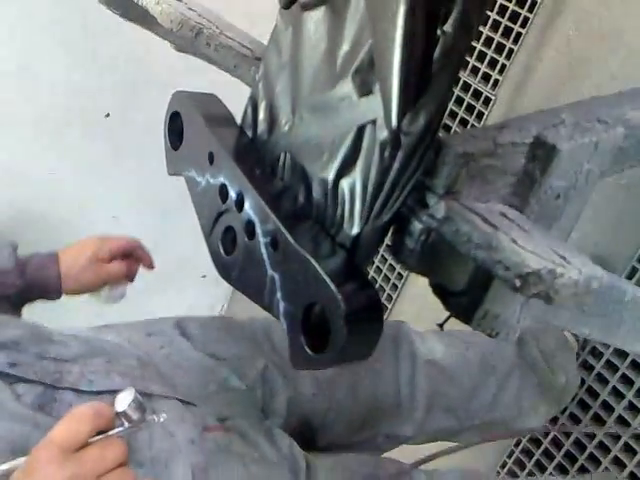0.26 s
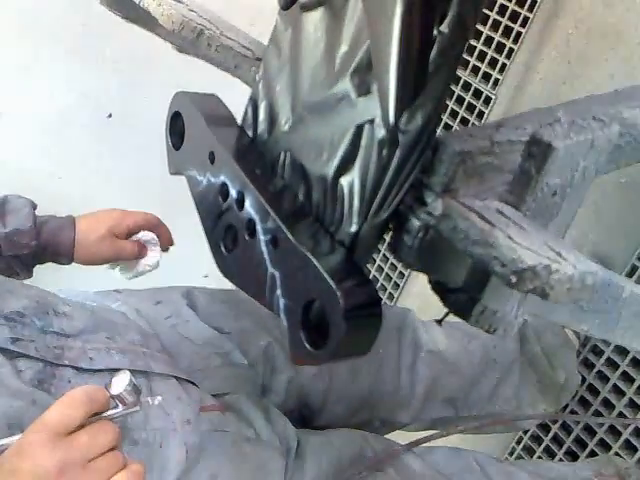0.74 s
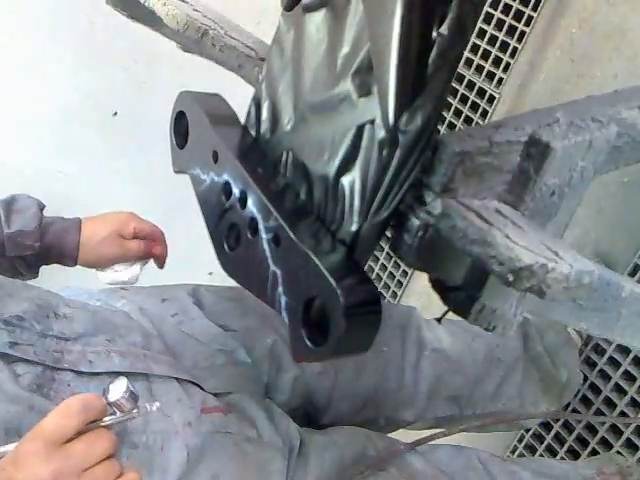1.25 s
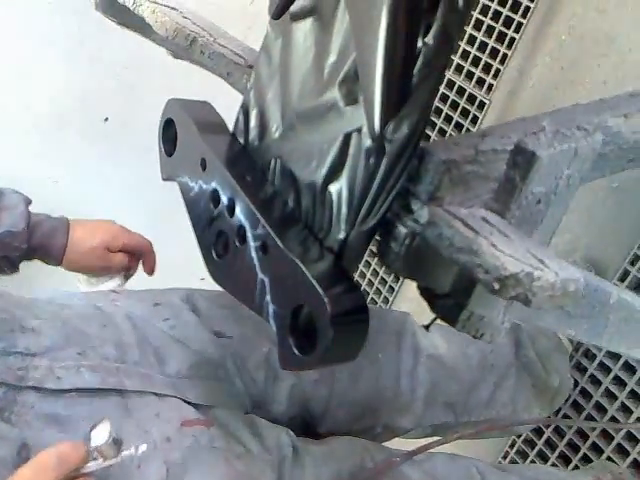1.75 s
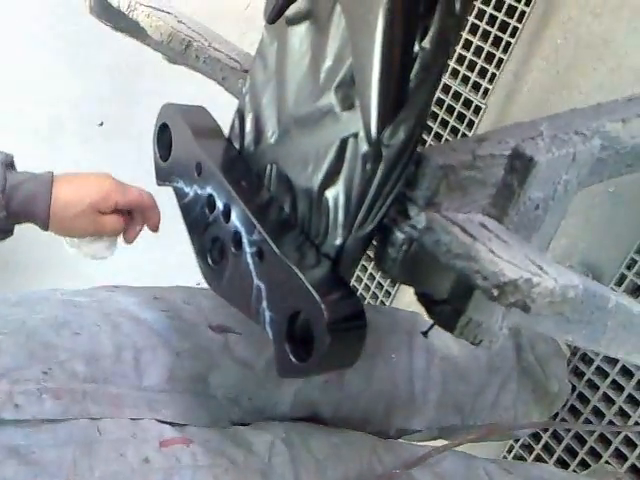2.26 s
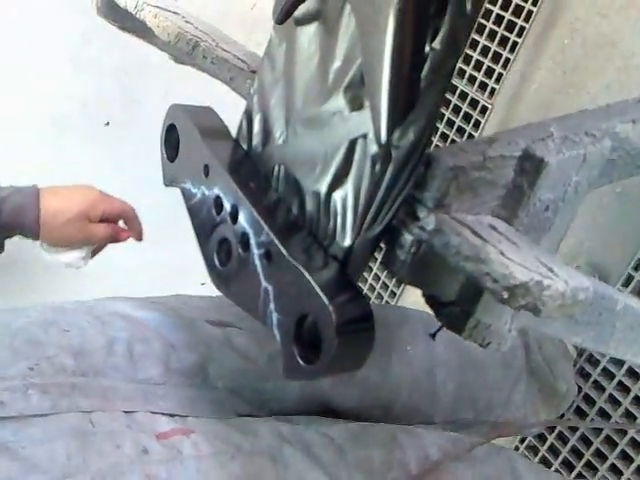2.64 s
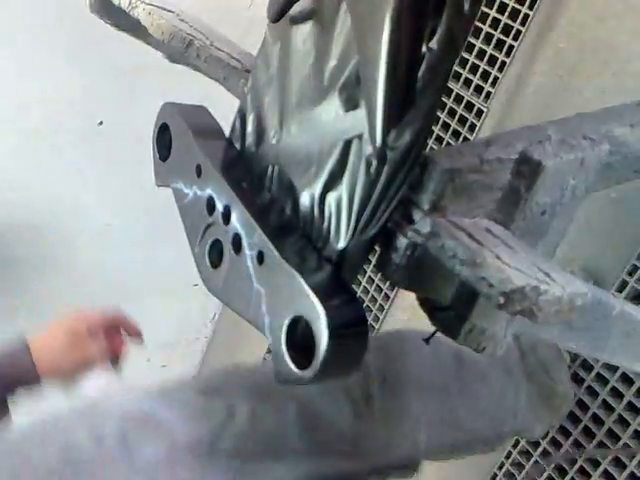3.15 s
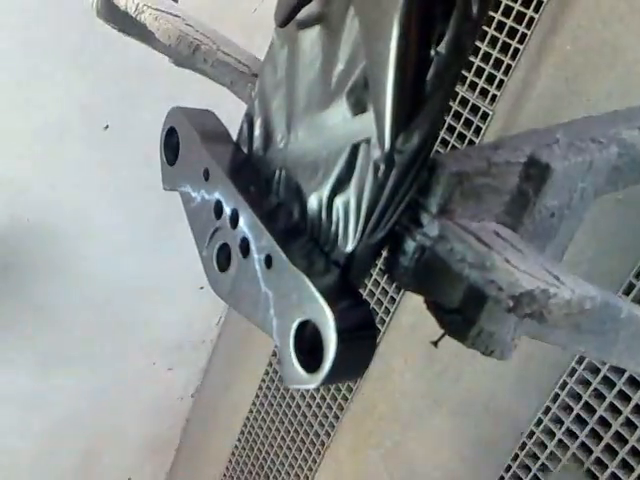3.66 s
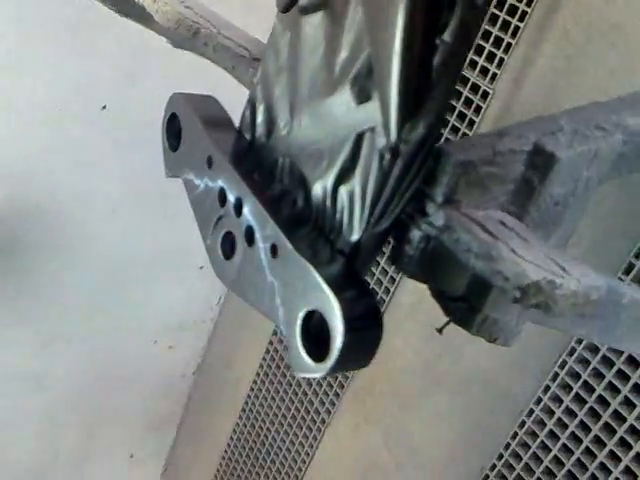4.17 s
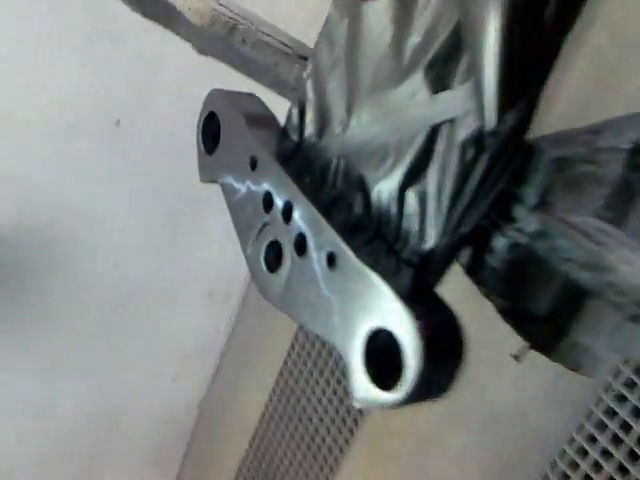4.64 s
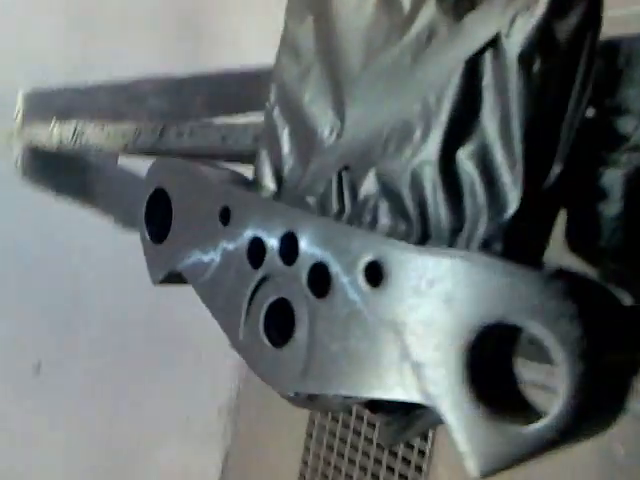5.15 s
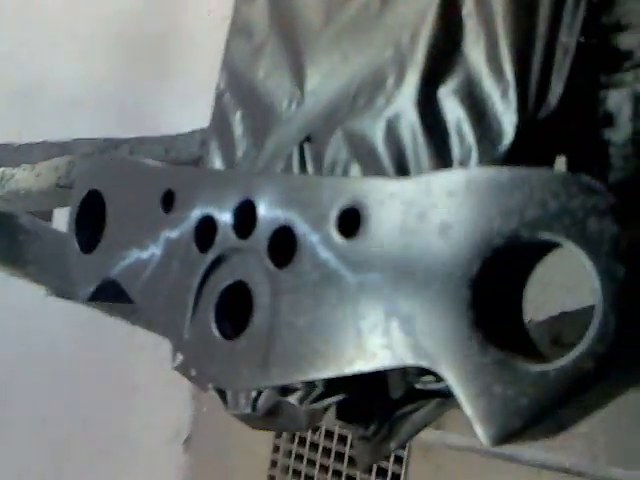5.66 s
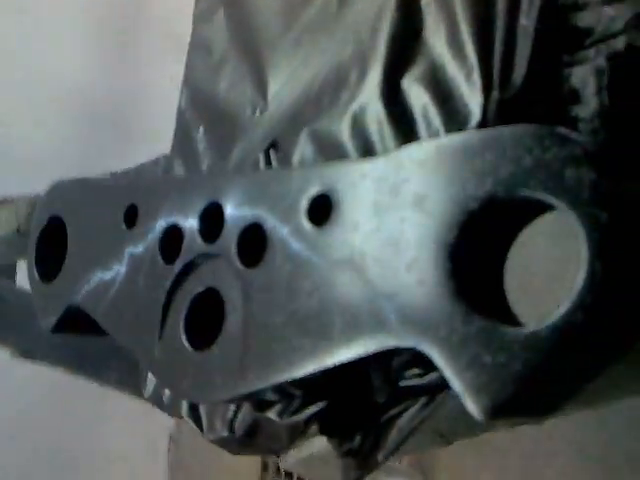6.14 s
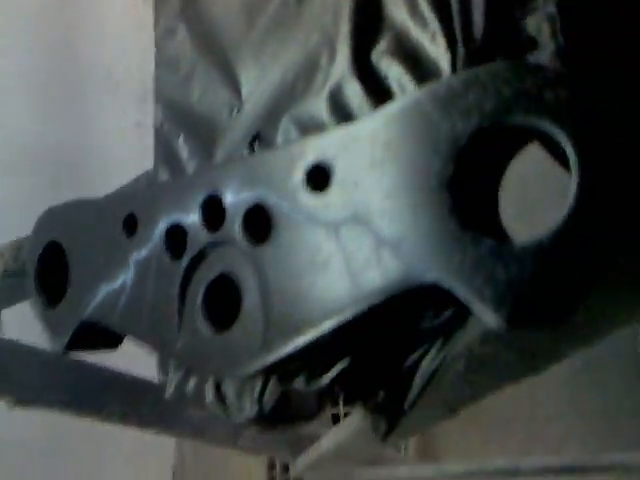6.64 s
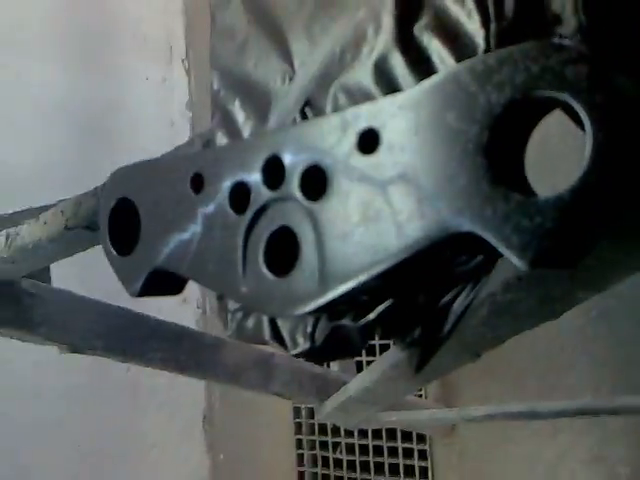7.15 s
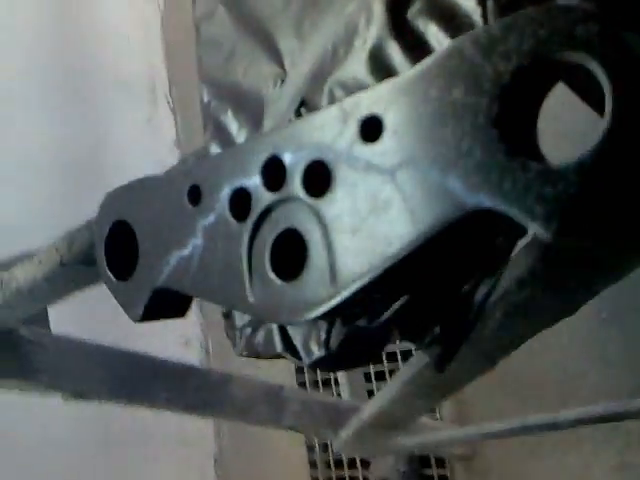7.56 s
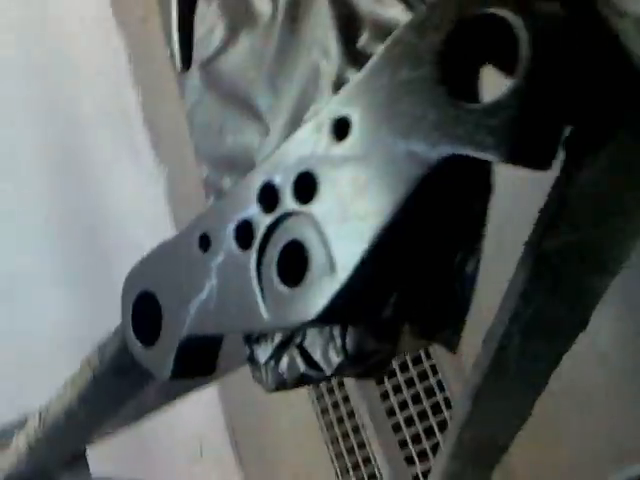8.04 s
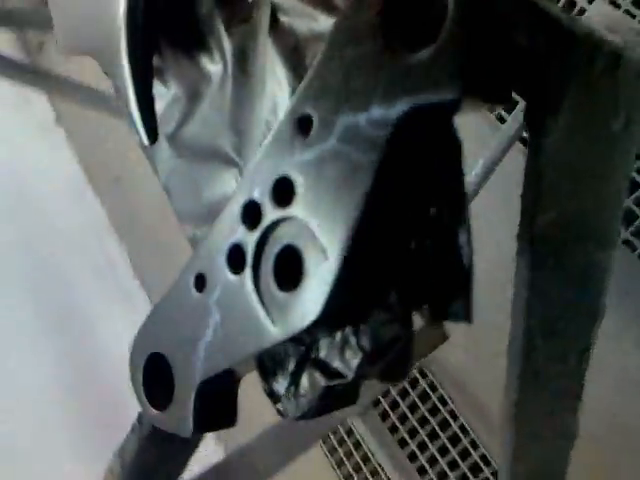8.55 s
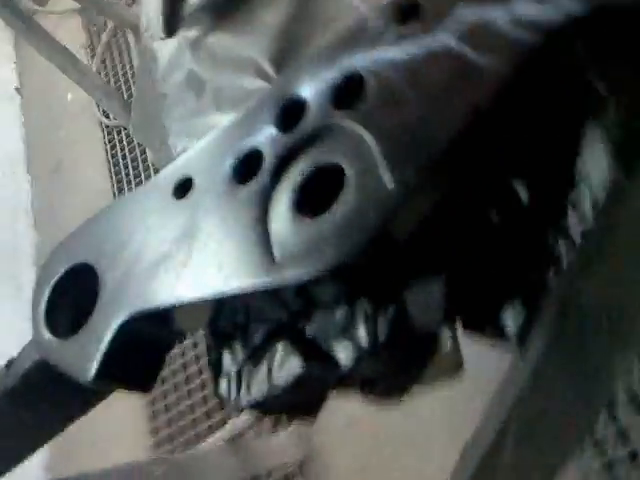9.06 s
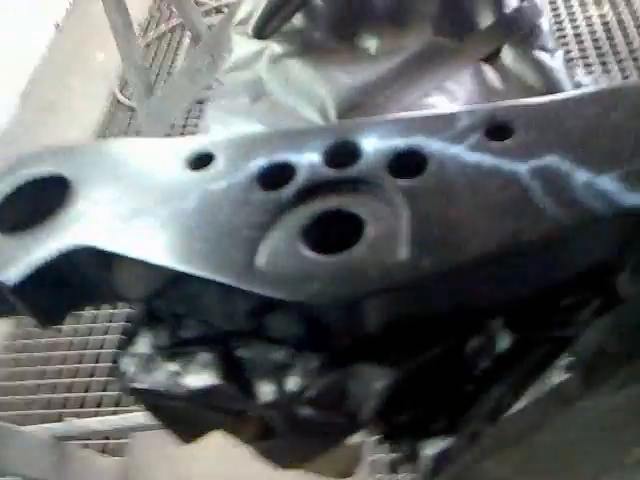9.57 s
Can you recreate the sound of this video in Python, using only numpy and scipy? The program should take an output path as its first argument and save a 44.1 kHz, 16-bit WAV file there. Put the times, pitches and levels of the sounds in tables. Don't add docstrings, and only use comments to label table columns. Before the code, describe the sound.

In a hard-walled spray booth, a big extraction fan roars low and steady with humming tones and dull, faint sheet rattles. For about four and a half seconds the microphone stays still; then it is carried about, bringing low draught buffets, finger thumps, a hard double knock past six seconds, a scratchy rub and snap past seven and a half, and a last thump near the end. The microphone is small and muffled.

```python
import sys
import numpy as np
from scipy import signal
from scipy.fft import rfft, irfft
from scipy.io import wavfile

SR = 44100
rng = np.random.default_rng(int(sys.argv[2]) if len(sys.argv) > 2 else 0)


def natural_amplitude(level_db):
    exponent = np.asarray(level_db, float) / 20
    return 10 ** exponent


def generate_wav(signal):
    frames = np.transpose(np.atleast_2d(signal))
    scaled = np.clip(frames, -1, 1) * 32767
    pcm = np.round(scaled).astype(np.int16)
    wavfile.write(sys.argv[1], SR, pcm)


N = 432180

SHAFT_HZ, MOTOR_HZ = 15.622, 382.6
STILL_LOW_DB, STILL_MID_DB, STILL_TOP_DB = -1, -0.73, -8
MIDS_FOLLOW, TREBLE_FOLLOWS = 1, 0.8
TURN_S, TURN_LENGTH_S, TURN_DB = 6.48, 0.14, 7
PUFF_HZ, PUFF_LETS_GO, PRESS_LETS_GO = 105, 1.55, 1.18
CASING_HZ, CASING_T60_S, CASING_DB = 400, 0.03, -15.5
DULL_RING_HZ = 770
RUSTLE_LOW_HZ, RUSTLE_HIGH_HZ = 2800, 6200
BASS_CUT_HZ, HISS_DB = 33, -97.5

# pitch_hz, level_db (per Hz)
ROAR_COLOUR = [(20, -20), (45, -13.5), (90, -3), (160, -5.5), (260, -5.5), (380, -7.5), (550, -14),
               (760, -15.5), (1000, -17), (1400, -23.5), (2200, -40), (3500, -53), (4500, -63), (6000, -71),
               (9000, -89.5)]
# order (multiple of the turning speed), level_db (rms)
SHAFT_TONES = [(2, -67), (3, -55.5), (4, -51), (6, -54), (8, -61.5), (9, -61.5), (12, -55.5), (16, -63.5),
               (17, -62), (21, -55.5), (42, -70), (48, -61.5)]
# order (multiple of its lowest pitch), level_db (rms)
MOTOR_TONES = [(1, -62), (2, -71.5), (3, -75.5)]
# pitch_hz, level_db (rms)
SECOND_DRIVE = [
    (129.3, -53.5),
    (275.7, -56),
]
# pitch_hz, width_hz, level_db (rms)
DUCT_HUMS = [(93, 5.3, -66.5), (151.3, 11, -68.5), (192.9, 7.6, -61), (806, 21, -72.5)]
# time_s, tone_gain_db
STANDING_WAVES = [(0, 2.3), (4.5, 0.2), (5.6, 4), (6.35, 2.5), (7.0, 1.5), (8.0, 0.3), (9.05, 2),
                  (9.8, -0.4)]
# time_s, nearness_db (to the filter wall), uncovered_db (port)
GRIP_MOVES = [(0, -1.5, 2), (4.5, 0.5, 0), (4.95, -3, 1), (5.5, -2.5, 7), (5.65, -3, 6), (5.95, -5.5, 6),
              (6.44, 0, 2), (6.61, 2, 3.5), (7.0, 1.5, 7), (7.4, 2.5, 0), (7.64, 0, 6.5), (7.85, 1.5, 7),
              (8.13, 1.5, 6), (8.55, -1.5, 4.5), (8.8, -1, 3.5), (9.09, -3, 9), (9.4, -3.5, 2.5),
              (9.8, -4, 5.5)]
# time_s, level_db (rms)
DRAUGHT_LEVEL = [(0, -64.5), (4.4, -59), (4.9, -46.5), (5.37, -40.5), (5.68, -58.5), (6.1, -45),
                 (6.8, -50.5), (7.26, -41), (7.42, -54), (7.78, -42.5), (8.15, -47), (8.8, -46),
                 (9.09, -40.5), (9.5, -51.5), (9.8, -36)]
# peak_s (moment of the peak), peak_db
PORT_PUFFS = [(4.539, -27.5), (4.579, -30), (4.779, -27), (4.868, -33), (5.11, -33), (5.241, -27),
              (5.327, -37), (5.373, -33), (6.73, -31), (6.790, -29), (7.08, -28.5), (7.429, -27),
              (7.745, -40), (8.012, -31), (8.094, -28.5)]
# peak_s (moment of the peak), peak_db, pitch_hz, slower (how many times slower
FINGER_SNAPS = [
    (4.598, -26.5, 139, 1.9),
    (5.094, -28, 155, 2),
    (6.2755, -16.5, 220, 1.56),
    (6.2854, -22, 232, 2.6),
    (7.579, -19.5, 400, 1.65),
    (8.805, -22.5, 150, 1.9),
    (8.871, -29.5, 138, 1.5),
    (9.7144, -19.5, 253, 1.8),
]
# peak_s (moment of the peak), peak_db, pitch_hz
FINGER_PRESSES = [(4.949, -31, 80), (6.2730, -21, 282), (6.2828, -21, 75), (7.199, -30.5, 150),
                  (7.418, -28, 59), (7.5737, -26.5, 280), (7.583, -25.5, 200), (7.590, -25, 70),
                  (7.732, -27.5, 218), (7.751, -29.5, 75), (9.706, -25, 62)]
# middle_s, level_db (rms), length_s, extra_db (above 6 kHz)
FINGER_RUBS = [(6.28, -93, .012, 27), (7.418, -42, 0.013, -2.5), (7.586, -48.5, 0.0081, 0.5),
               (7.754, -53, 0.011, -5), (7.793, -57, 0.0095, -8), (7.965, -73, 0.032, 5.5),
               (8.223, -70, .022, 5), (8.261, -74.5, 0.026, 0.5), (9.127, -74.5, .016, 1.5),
               (9.716, -88, 0.0036, 16), (7.435, -66.5, 0.02, 2.5)]
# pitch_hz, level_db (per Hz)
RUB_COLOUR = [(400, -21), (900, 2.5), (1700, 1), (2570, -9.5), (2950, -15), (3300, -9.5), (4390, -6),
              (5500, -16.5), (6960, -19.5), (8890, -29.5), (16000, -32)]
# start_s, peak_db, pitch_hz, t60_s (time to fall by 60 dB)
STIFF_TICK = (7.965, -69, 6050, .03)
# middle_s, level_db (rms), length_s
SLEEVE_RUSTLES = [
    (6.45, -97, 0.17),
    (6.948, -93, .3),
    (8.55, -90.5, .35),
]
# start_s, peak_db
DULL_RINGS = [(0.693, -38.5), (1.108, -47), (1.523, -44), (1.67, -44), (1.758, -40.5), (2.106, -39),
              (2.233, -37.5), (2.461, -37), (4.071, -41), (5.409, -38.5), (5.458, -41), (6.536, -36),
              (6.584, -33), (6.727, -33), (6.828, -34), (7.245, -40), (7.405, -33), (7.662, -33),
              (7.685, -29), (7.867, -40), (8.101, -44), (8.201, -34.5), (9.042, -37.5), (9.383, -38)]
# time_s, level_db (rms)
GUN_LEAK = [
    (0, -110),
    (.7, -106),
    (1.0, -97),
    (1.65, -97),
    (1.8, -107),
    (9.8, -104),
]


def in_time(rows):
    times, *columns = np.transpose(rows)
    return [np.interp(np.arange(N) / SR, times, column) for column in columns]


def rms_one(x):
    return x / np.sqrt(np.mean(x ** 2) + 1e-20)


def drift(rate):
    r = np.exp(-80 * np.pi * rate / SR)
    noise = rng.standard_normal(N // 40 + 2002)
    slow = signal.lfilter([1], [1, -2 * r, r * r], noise)[2000:]
    return np.interp(np.arange(N) / 40, np.arange(len(slow)), rms_one(slow))


def coloured(x, spectrum):
    hz, level_db = np.transpose(spectrum)
    bins = np.maximum(np.fft.rfftfreq(N, 1 / SR), 1)
    gain = natural_amplitude(np.interp(np.log(bins), np.log(hz), level_db))
    return irfft(rfft(x) * gain, N)


def filtered(x, order, hz, kind):
    return signal.sosfilt(signal.butter(order, hz, kind, fs=SR, output="sos"), x)


def air_roar(gust_db=2.38, flicker_db=1.06, throb_db=-0.5):
    turn = np.cos(2 * np.pi * SHAFT_HZ * np.arange(N) / SR + 0.8 * drift(2.3))
    gusts = gust_db * drift(45) + 0.76 * drift(2.0)
    white = rng.standard_normal((2, N))
    edges = 16 * 2 ** np.arange(0, 10.1, 0.5)
    out = 0
    for k, (low, high) in enumerate(zip(edges, edges[1:])):
        band = filtered(white[k % 2], 2, [low, high], "band")
        throb = throb_db * np.exp(-np.log2(low / 1100) ** 2 / 2.0) * turn
        gust = gusts / (1 + (low / 4000) ** 2)
        out = out + band * natural_amplitude(gust + throb + flicker_db * drift(26))
    return natural_amplitude(-44.5) * rms_one(coloured(out, ROAR_COLOUR))


def tones(speed_hz, orders, waver_db, slip):
    phase = 2 * np.pi * np.cumsum(speed_hz * (1 + slip * drift(0.65))) / SR
    out = 0
    for order, level_db in orders:
        level = np.sqrt(2) * natural_amplitude(level_db + waver_db * drift(2.1))
        out = out + level * np.sin(round(order) * phase + rng.uniform(0, 2 * np.pi))
    return out


def machine_tones():
    hum = tones(SHAFT_HZ, SHAFT_TONES, waver_db=3.0, slip=0.0008)
    hum = hum + tones(MOTOR_HZ, MOTOR_TONES, waver_db=5.0, slip=0.0008)
    for hz, level_db in SECOND_DRIVE:
        hum = hum + tones(hz, [(1, level_db)], waver_db=2.0, slip=0.003)
    return natural_amplitude(in_time(STANDING_WAVES)[0]) * hum


def duct_hum():
    out = 0
    for hz, width, level_db in DUCT_HUMS:
        r = np.exp(-np.pi * width / SR)
        section = [1, 0, -1, 1, -2 * r * np.cos(2 * np.pi * hz / SR), r * r]
        hum = signal.sosfilt([section, section], rng.standard_normal(N))
        out = out + natural_amplitude(level_db) * rms_one(hum)
    return out


def fan_through_grip():
    fan = air_roar() + machine_tones() + duct_hum()
    near_db, open_db = in_time(GRIP_MOVES)
    turned_db = TURN_DB * np.clip((np.arange(N) / SR - TURN_S) / TURN_LENGTH_S + 0.5, 0, 1)
    spectrum, hz = rfft(fan), np.fft.rfftfreq(N, 1 / SR)
    above_600, above_1600 = [1 / (1 + (edge_hz / (hz + 1)) ** 4) for edge_hz in (600, 1600)]
    low = irfft(spectrum * (1 - above_600), N)
    mid = irfft(spectrum * (above_600 - above_1600), N)
    top = irfft(spectrum * above_1600, N)
    mid_db = STILL_MID_DB + MIDS_FOLLOW * open_db
    top_db = STILL_TOP_DB + TREBLE_FOLLOWS * open_db + turned_db
    return natural_amplitude(near_db) * (natural_amplitude(STILL_LOW_DB) * low + natural_amplitude(mid_db) * mid + natural_amplitude(top_db) * top)


def puff(hz, slower):
    u = np.pi * hz * np.arange(-1500, 1501) / SR
    stretch = np.where(u > 0, max(slower, 1), 1)
    return (1 - 2 * u ** 2 / stretch ** 3) * np.exp(-(u / stretch) ** 2)


def random_bursts(per_s, spread_db, signs):
    happens = rng.random(N) < per_s / SR
    strength = natural_amplitude(spread_db * np.minimum(rng.exponential(1, N), 3))
    return happens * strength * rng.choice(signs, N)


def buffeting(per_s=110):
    lumps = random_bursts(per_s, 3.0, [-1, -1, 1])
    size = rng.integers(0, 3, N)
    out = 0
    for k, hz in enumerate((45, 105, 150)):
        out = out + signal.fftconvolve(lumps * (size == k), puff(hz, 1.0), "same")
    return natural_amplitude(in_time(DRAUGHT_LEVEL)[0]) * rms_one(out)


def knocks():
    rows = [(s, db, PUFF_HZ, -1, PUFF_LETS_GO) for s, db in PORT_PUFFS]
    rows += [(s, db, hz, -1, slower) for s, db, hz, slower in FINGER_SNAPS]
    rows += [(s, db, hz, 1, PRESS_LETS_GO) for s, db, hz in FINGER_PRESSES]
    out = np.zeros(N + 3001)
    for s, level_db, hz, push, slower in rows:
        at = round(s * SR)
        out[at:at + 3001] += push * natural_amplitude(level_db) * puff(hz, slower)
    return out[1500:N + 1500]


def ringing(s, level_db, hz, t60, spread):
    t = np.arange(round(0.1 * SR)) / SR
    pitches = hz * (1 + spread * rng.standard_normal(4))
    phases = rng.uniform(0, 0.49, 4)
    waves = np.sin(2 * np.pi * np.outer(pitches, t) + phases[:, None]).sum(0) / 2
    shape = np.minimum(t / 0.00056, 1) * natural_amplitude(-60 * t / t60) * waves
    out, at = np.zeros(N + len(t)), round(s * SR)
    out[at:at + len(t)] = natural_amplitude(level_db) * shape
    return out[:N]


def casing():
    rings = 0
    for s, level_db, *_ in FINGER_SNAPS:
        rings = rings + ringing(s - 0.002, level_db + CASING_DB, CASING_HZ, CASING_T60_S, spread=0.12)
    return filtered(rings, 4, 560, "low")


def rubs(per_s=1300):
    slips = random_bursts(per_s, 4.9, [-1, 1])
    body = rms_one(coloured(slips + rng.standard_normal(N), RUB_COLOUR))
    bright = filtered(body, 2, 6000, "high")
    t = np.arange(N) / SR
    out = 0
    for s, level_db, length, bright_db in FINGER_RUBS:
        stroke = natural_amplitude(level_db) * np.exp(-2.5 * np.abs((t - s) / length) ** 3.2)
        out = out + stroke * (body + (natural_amplitude(bright_db) - 1) * bright)
    return out


def stiff_tick():
    return ringing(*STIFF_TICK, spread=0.006)


def rustles():
    hiss = filtered(rng.standard_normal(N), 2, [RUSTLE_LOW_HZ, RUSTLE_HIGH_HZ], "band")
    t = np.arange(N) / SR
    swell = 0
    for s, level_db, length in SLEEVE_RUSTLES:
        swell = swell + natural_amplitude(level_db) * np.exp(-2 * ((t - s) / length) ** 2)
    return swell * natural_amplitude(1.2 * drift(25)) * rms_one(hiss)


def dull_rings():
    ring_sum = 0
    for s, level_db in DULL_RINGS:
        ring_sum = ring_sum + ringing(s, level_db - 3.0, DULL_RING_HZ, t60=0.049, spread=0.2)
    return filtered(ring_sum, 4, 1800, "low")


def gun_air():
    hiss = filtered(rng.standard_normal(N), 4, [3500, 4350], "band")
    return natural_amplitude(in_time(GUN_LEAK)[0]) * rms_one(hiss)


def scene():
    handling = buffeting() + knocks() + casing() + rubs() + stiff_tick()
    background = rustles() + dull_rings() + gun_air()
    return (fan_through_grip() + handling + background)[None]


def band_limit(x):
    return signal.sosfilt(signal.butter(12, 15800, fs=SR, output="sos"), x)


def record(dry):
    x = filtered(dry, 1, BASS_CUT_HZ, "high")
    x = x + natural_amplitude(HISS_DB) * rng.standard_normal(dry.shape)
    return band_limit(x)


dry = scene()
out = record(dry)
generate_wav(out)
```